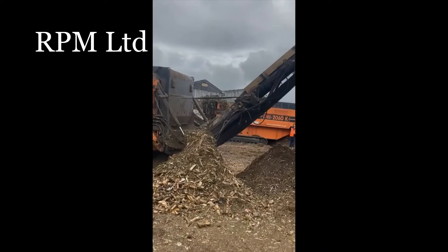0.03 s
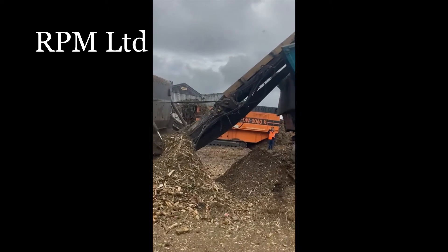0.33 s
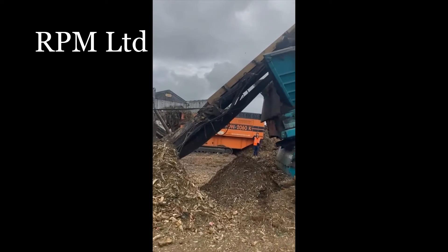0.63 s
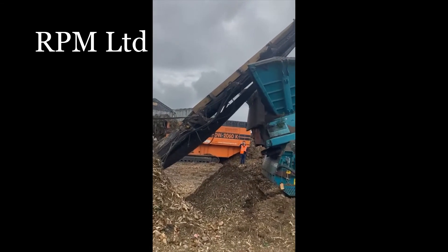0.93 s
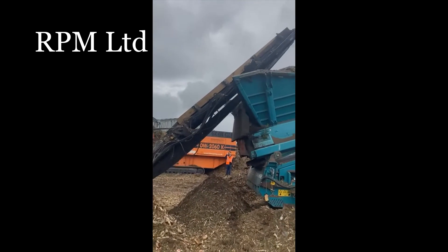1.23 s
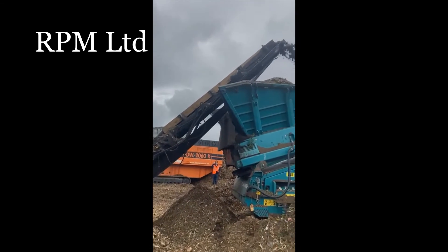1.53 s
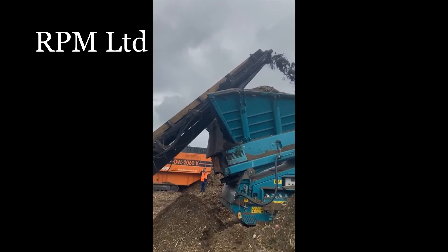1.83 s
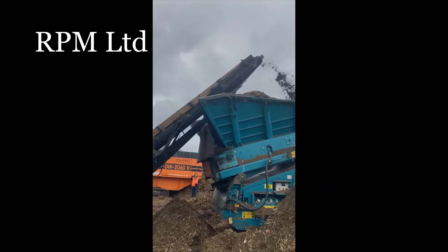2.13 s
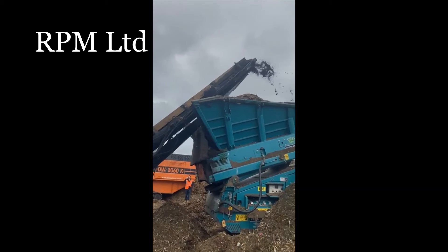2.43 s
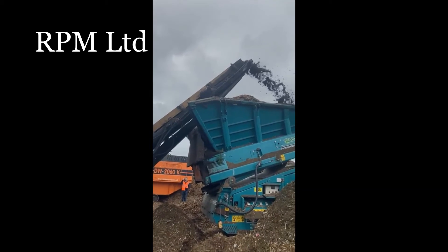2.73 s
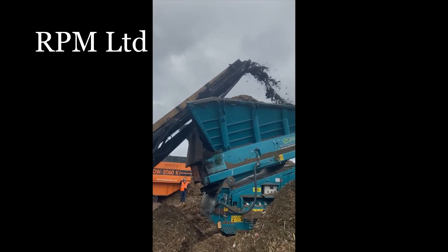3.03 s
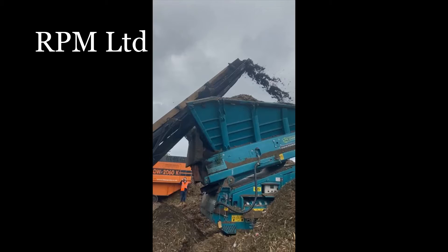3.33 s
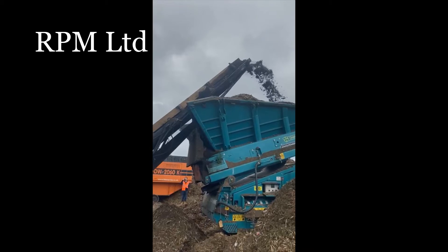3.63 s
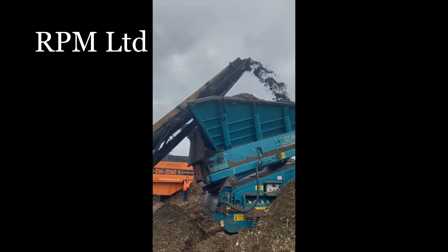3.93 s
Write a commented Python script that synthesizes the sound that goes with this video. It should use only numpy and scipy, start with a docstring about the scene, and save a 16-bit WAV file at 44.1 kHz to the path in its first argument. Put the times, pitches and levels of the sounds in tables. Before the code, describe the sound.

A diesel wood shredder drones and roars in an open yard, crunching wood about once a second as chips pour off a belt. The belt's rasp and a hydraulic whine give way to steel rattling, and wind briefly brushes the microphone.

```python
"""A diesel wood shredder runs under load in an open yard, heard from a slowly turning phone.
From the start the exhaust drones over engine and fan roar, drives whine and chips pour off a rasping belt.
About once a second the rotor bites, crunching and cracking wood; near 1 s and 1.8 s heavy pieces hit
the hopper. By 2 s the phone has turned from the belt and hissing hydraulics to a rattling steel screen.
Near 3.1 s a gust brushes the microphone."""
import sys
import numpy as np
from scipy import signal
from scipy.fft import rfft, irfft
from scipy.io import wavfile

SR = 44100
rng = np.random.default_rng(int(sys.argv[2]) if len(sys.argv) > 2 else 0)


def log_audio(samples):
    """Write samples as a 16-bit WAV file to the path given in sys.argv[1]."""
    # one column per channel
    frames = np.atleast_2d(samples).T
    # limit to full scale, then quantise
    limited = np.clip(frames, -1, 1)
    pcm = np.round(limited * 32767).astype(np.int16)
    wavfile.write(sys.argv[1], SR, pcm)


N = 176400
TIME = np.arange(N) / SR
FREQS = np.fft.rfftfreq(N, 1 / SR)
PATHS = (3, N)  # direct, scattered to the left port, scattered to the right port


# Engine speed. Each row: time in seconds, firing rate in Hz.
FIRING_HZ = [(0, 75.1), (1, 75.4), (2, 75.7), (4, 75.7)]

def firing_phase(wander=0.00319):
    """Diesel firing cycle; the speed wanders slightly."""
    return cycle(curve(FIRING_HZ, TIME) * (1 + wander * walk(6.16)))


# Exhaust harmonics. Each row: multiple of the firing rate, relative level in dB.
EXHAUST_HARMONICS = [(1, 0), (2, -16.5), (3, -22), (4, -23.5), (5, -41.5), (6, -28.5), (7, -30.5), (8, -38)]

def exhaust(phase, level_db=-15, pan_db=5.5, throb_db=-0.03, flutter_db=0.9):
    """One firm pulse per firing; the overtones flutter with the load."""
    drone = undb(throb_db * walk(4.7)) * np.sin(phase)
    for k, db in EXHAUST_HARMONICS[1:]:
        drone += undb(db + flutter_db * walk(12)) * np.sin(round(k) * phase)
    return np.sqrt(2) * drone * undb(level_db + np.array([[1], [-1]]) * pan_db / 2)


# Engine and fan noise. Each row: frequency in Hz, relative density in dB.
ROAR_SPECTRUM = [(20, -6), (38, -6), (58, 4.5), (120, 5.5), (180, -1.5), (290, 5), (450, -6), (820, -5.5),
                 (1000, -13), (1550, -17), (2200, -17), (2900, -23), (5000, -23.5), (6000, -20.5),
                 (11500, -43.5)]
# Roar bands. Each entry: band edge in Hz.
ROAR_EDGES_HZ = [0, 500, 1000, 2000, 4000, 7000, 22050]

def roar(phase, level_db=-23.5, pulse_depth=0.054, pulse_rolloff_hz=450, sway_db=.6):
    """Combustion and fan noise: the lows pulse with the firings, each band sways on its own."""
    noise = rfft(colour(rng.standard_normal(PATHS), spectrum(ROAR_SPECTRUM)))
    out = 0
    for lo, hi in zip(ROAR_EDGES_HZ, ROAR_EDGES_HZ[1:]):
        band = irfft(noise * ((FREQS >= lo) & (FREQS < hi)), N)
        pulsing = 1 + pulse_depth * np.exp(-lo / pulse_rolloff_hz) * np.cos(phase)
        out += band * pulsing * undb(sway_db * walk(30))
    return undb(level_db) * out


# Breaking wood. Each row: frequency in Hz, relative density in dB.
WOOD_SPECTRUM = [(200, -38), (600, 8.5), (1100, 6), (1700, 2.5), (2200, 3.5), (3000, 4), (5000, -6),
                 (8000, -11), (11500, -31)]
# Steel hopper resonances. Each row: frequency in Hz, width in Hz, gain in dB.
HOPPER_MODES = [(680, 22, -3.5), (872, 16, -1.5), (1098, 12, 3.5), (1163, 18, -1), (1389, 16, -4),
                (1674, 16, -3.5), (2595, 20, -6), (2960, 30, -8), (3430, 16, -8.5), (4300, 20, -12)]
# Rotor bites. Each row: start in seconds, length in seconds, level in dB, treble gain in dB.
ROTOR_BITES = [(-0, 0.1, -46.5, 17.5), (0.79, 0.24, -33, 8), (1.35, 0.2, -37, 10), (1.736, 0.12, -24, -1),
               (1.846, 0.325, -30, -3.5), (2.623, 0.15, -34.5, 6.5), (2.812, 0.14, -27.5, -8),
               (3.527, 0.15, -22.5, -8.5), (3.735, 0.073, -32, -8)]
# Single pieces snapping. Each row: start in seconds, level in dB, treble gain in dB.
WOOD_SNAPS = [(.066, -25.5, 4), (.897, -20.5, 4), (.906, -20.5, 5), (1.034, -24, -5), (1.500, -22, -6),
              (1.705, -20, 2), (1.749, -21, 3), (1.768, -20, -6), (1.787, -19.5, -6), (1.815, -19.5, 1),
              (2.082, -25, -4), (2.589, -25, 2), (2.816, -22.5, 2), (3.563, -22.5, -1), (3.652, -22, -4),
              (3.988, -23, 1)]

def shredding(bite_attack_s=.02, bite_release_s=.055, snap_attack_s=.002, snap_decay_s=.014):
    """The rotor breaks wood in runs of splintering and sharp snaps, coloured by the hopper."""
    hopper = 1 + sum(undb(db) * resonance(hz, width) for hz, width, db in HOPPER_MODES)
    splinters = unit(clicks(per_s=1200, spread_db=1))
    fibres = unit(clicks(per_s=4100, spread_db=-0.5))
    blows = []
    for start, length, db, treble_db in ROTOR_BITES:
        rise = np.clip((TIME - start) / bite_attack_s, 0, 1)
        fall = np.clip((start + length - TIME) / bite_release_s + .5, 0, 1)
        blows.append((undb(db) * rise * fall * splinters, treble_db))
    for start, db, treble_db in WOOD_SNAPS:
        age = np.maximum(TIME - start, 0)
        envelope = np.minimum(age / snap_attack_s, 1) * np.exp(-age / snap_decay_s)
        blows.append((undb(db) * envelope * fibres, treble_db))
    treble = highpass(corner_hz=2200)
    lows = rfft(sum(blow for blow, _ in blows)) * (1 - treble)
    highs = rfft(sum(blow * undb(db) for blow, db in blows)) * treble
    return irfft((lows + highs) * unit(spectrum(WOOD_SPECTRUM) * hopper), N)


# Hopper strikes. Each row: start in seconds, level in dB, tilt about 1 kHz in dB per octave.
HOPPER_KNOCKS = [(.902, -23, 5.5), (1.040, -29, -4), (1.753, -30, 5), (1.773, -20.5, -3), (1.817, -26, -7)]

def knocks(attack_s=.003):
    """Heavy pieces hit the hopper wall and ring its modes."""
    out = np.zeros(N)
    for start, db, tilt in HOPPER_KNOCKS:
        age = np.maximum(TIME - start, 0)
        for hz, width, mode_db in HOPPER_MODES:
            gain = undb(db + mode_db + tilt * np.log2(hz / 1000))
            envelope = np.minimum(age / attack_s, 1) * np.exp(-np.pi * width * age)
            out += gain * envelope * np.sin(2 * np.pi * (hz * age + rng.random()))
    return ports(out)


# Chip stream. Each row: time in seconds, level in dB.
CHIP_FLOW_DB = [(0, -35), (.6, -37.5), (1.2, -37), (2, -36), (2.4, -35.5), (2.9, -34.5), (4, -35)]
# Chip rustle. Each row: frequency in Hz, relative density in dB.
CHIP_SPECTRUM = [(300, -1), (850, 3), (1250, 6.5), (1700, -2.5), (2200, -28), (2900, 10.5), (3500, -42),
                 (5200, -5), (9000, 3), (11500, -7)]
# Clumps landing. Each row: time in seconds, gain of the high-passed rustle in dB.
CHIP_CLUMPS = [(1.44, 10), (1.76, 6), (1.97, 10), (2.69, 6), (2.78, 2), (2.88, 11), (2.95, 9), (3.11, 12),
               (3.34, 6), (3.56, 7.5), (3.87, 4.5)]

def chips(flutter_db=0.5, clump_half_width_s=0.021):
    """Chips pour off the belt unevenly; a landing clump brightens the rustle."""
    clump_db = sum(db * swell(at, clump_half_width_s) for at, db in CHIP_CLUMPS)
    rustle = colour(clicks(per_s=6000, spread_db=2), spectrum(CHIP_SPECTRUM))
    bright = irfft(rfft(rustle) * highpass(corner_hz=12400), N)
    flow = undb(curve(CHIP_FLOW_DB, TIME) + flutter_db * walk(20))
    return flow * (rustle + (undb(clump_db) - 1) * bright)


def lumps(per_s=260, level_db=-30, t60_s=0.098, low_hz=520, high_hz=3100):
    """Wood lumps tumble in the hopper, each ringing briefly; louder with the chip stream."""
    tilt_db_per_octave, spread_db = -2.3, 0.5
    out = np.zeros((2, N))
    for when, pitch, size, left, right in rng.random((int(per_s * N / SR), 5)):
        start = int(when * N)
        hz = low_hz * (high_hz / low_hz) ** pitch
        db = tilt_db_per_octave * np.log2(hz / low_hz) - spread_db * np.log(size + 0.01)
        ring = undb(db) * damped_sine(hz, t60_s)
        out[:, start:start + len(ring)] += np.outer([.5 + left, .5 + right], ring[:N - start])
    return undb(level_db) * unit(ports(out) * undb(curve(CHIP_FLOW_DB, TIME)))


# Shaft, gear and pump tones. Each row: frequency in Hz, level in dB, width in Hz.
DRIVE_TONES = [(56.5, -37, 4), (122, -35, 1.5), (189.5, -40, 1.5), (214, -37, 1), (268, -37, 8),
               (452, -45, 6), (883, -40, 14), (1097, -45, 14), (1286, -45, 8), (1608, -47, 12)]

def drives(flutter_db=2):
    """Drive train tones, unsteady in pitch and level."""
    out = np.zeros(N)
    for hz, db, width in DRIVE_TONES:
        flutter = undb(flutter_db * walk(10))
        phase = cycle(hz + .7 * width * walk(14))
        out += undb(db) * unit(flutter * np.sin(phase))
    return ports(out)


# Belt rasp. Each row: frequency in Hz, relative density in dB.
BELT_SPECTRUM = [(250, -34), (550, -1.5), (850, -1.5), (1150, 0), (1650, -5.5), (2100, -16), (2600, -8.5),
                 (3300, -11.5), (6000, -77)]
# Rasp as the phone turns away. Each row: time in seconds, level in dB.
BELT_DB = [(0, -30.5), (.9, -31.5), (1.6, -38.5), (2.2, -43), (4, -38)]
# Conveyor frame resonances. Each row: frequency in Hz, width in Hz, gain in dB.
FRAME_MODES = [(3740, 260, -5), (4250, 380, -1), (4520, 380, 0)]
# Frame scrape. Each row: time in seconds, level in dB.
SCRAPE_DB = [(0, -43), (.7, -43.5), (1.45, -42), (1.65, -46.5), (1.8, -41), (2.2, -58.5), (3.3, -59),
             (3.65, -45), (4, -55)]

def conveyor(left_lag_s=.00038):
    """The belt rasps over its rollers off to the right and scrapes its frame straight ahead."""
    left = colour(clicks(per_s=4000, spread_db=2)[0], spectrum(BELT_SPECTRUM))
    right = irfft(rfft(left) * np.exp(2j * np.pi * FREQS * left_lag_s), N)
    rasp = undb(curve(BELT_DB, TIME)) * np.array([left, right])
    return rasp + undb(curve(SCRAPE_DB, TIME)) * rubbed_steel(FRAME_MODES)


# Screen rattle. Each row: frequency in Hz, relative density in dB.
RATTLE_SPECTRUM = [(300, -37), (650, 12), (900, 6), (1100, 6), (1550, 10), (2100, -6), (2850, 2.5),
                   (3400, -66), (9000, -71)]
# Rattle as the phone turns towards it. Each row: time in seconds, level in dB.
RATTLE_DB = [(0, -57), (1.2, -37.5), (2, -36), (4, -35)]
# Screen resonances. Each row: frequency in Hz, width in Hz, gain in dB.
SCREEN_MODES = [(2530, 180, -2), (2700, 200, -2), (2890, 220, 0)]
# Sliding loads. Each row: peak time in seconds, half width in seconds, level in dB.
SCREEN_LOADS = [(2.1, 0.1, -42.5), (2.69, 0.048, -42), (2.88, 0.053, -36.5), (3.62, 0.1, -42.5)]

def screen():
    """Loose wood chatters on a shaking steel screen, which rings when a load slides over it."""
    chatter = colour(clicks(per_s=900, spread_db=6), spectrum(RATTLE_SPECTRUM))
    loads = sum(undb(db) * swell(at, half_width) for at, half_width, db in SCREEN_LOADS)
    return yard(undb(curve(RATTLE_DB, TIME)) * chatter) + loads * rubbed_steel(SCREEN_MODES)


def rubbed_steel(modes, flare_db=1.8):
    """Dense stick-slip ticks ring each resonance, which swells a little on its own."""
    ticks = clicks(per_s=2500, spread_db=2)[0]
    out = np.zeros(N)
    for hz, width, db in modes:
        ring = colour(ticks, resonance(hz, width) ** 2)
        out += undb(db + flare_db * walk(14)) * ring
    return unit(out)


def pings(per_s=90, t60_s=.14, relative_db=-8):
    """Single chips ring the screen or frame near a resonance; the level follows the rattle."""
    out = np.zeros(N)
    modes = SCREEN_MODES + FRAME_MODES
    for when, which, offset in rng.random((int(per_s * N / SR), 3)):
        start = int(when * N)
        hz, width, _ = modes[int(which * len(modes))]
        ring = damped_sine(hz + (offset - .5) * 2 * width, t60_s) / hz
        out[start:start + len(ring)] += ring[:N - start]
    return undb(relative_db + curve(RATTLE_DB, TIME)) * unit(out)


# Hydraulic whine. Each row: time in seconds, fundamental level in dB, octave level in dB.
WHINE_DB = [(0, -40, -53), (1.3, -39, -55), (1.7, -50, -55), (2.5, -54, -45.5), (4, -57, -47.5)]
# Oil hiss. Each row: frequency in Hz, relative density in dB.
HISS_SPECTRUM = [(1200, -41), (2500, -20), (3200, 21), (3900, -5), (4600, 0), (5900, -6), (7200, -40),
                 (11000, -53)]
# Hiss as the phone turns away. Each row: time in seconds, level in dB.
HISS_DB = [(0, -41), (1, -42), (2, -50), (4, -55)]

def hydraulics(whine_hz=1933, waver_hz=5, flutter_db=3):
    """A wavering whine and its octave over the hiss of oil."""
    phase = cycle(whine_hz + waver_hz * walk(25))
    times, *levels = np.array(WHINE_DB).T
    whine = np.zeros(N)
    for k, db in enumerate(levels, 1):
        partial = unit(undb(flutter_db * walk(15)) * np.sin(k * phase))
        whine += undb(np.interp(TIME, times, db)) * partial
    hiss = colour(rng.standard_normal(PATHS), spectrum(HISS_SPECTRUM))
    return yard(undb(curve(HISS_DB, TIME)) * hiss) + ports(whine)


def gust(at_s=3.095, half_width_s=.02, level_db=-15.5, corner_hz=115):
    """A short buffet of wind, independent at each microphone port."""
    ratio = FREQS / corner_hz
    rumble = colour(rng.standard_normal((2, N)), ratio / (1 + ratio ** 3))
    return undb(level_db) * swell(at_s, half_width_s) * rumble


# Yard scatter. Each row: frequency in Hz, level against the direct sound in dB.
SCATTER_DB = [(30, 0), (100, -3), (1500, -4.5), (4000, -6.5), (5500, -10.5), (11000, -10.5)]

def yard(paths):
    """Direct sound plus what machines and heaps scatter to each port."""
    return ports(paths[0]) + irfft(rfft(paths[1:]) * spectrum(SCATTER_DB), N)


# Port phase. Each row: frequency in Hz, lead of the left port in radians.
LEFT_LEAD_RAD = [(0, 0), (320, -.25), (500, -1.3), (860, -1.3), (1300, -.4), (1700, .3), (2150, 2.7),
                 (2700, 2), (3200, 3.1), (5200, 3.1), (6300, 3.2), (7200, 5.5), (7800, 6.2), (9500, 6.4),
                 (10200, 7.3), (10700, 9), (11700, 9.4)]
# Port balance. Each row: frequency in Hz, left minus right in dB.
BALANCE_DB = [(30, 4), (130, 2), (330, 3), (750, .5), (1200, -3.5), (2100, 0), (11000, .3)]

def ports(x):
    """Direct sound reaches the two microphone ports out of step and unequally loud."""
    sides = np.array([[.5], [-.5]])
    shift = np.exp(1j * sides * curve(LEFT_LEAD_RAD, FREQS))
    return irfft(rfft(x) * shift * spectrum(BALANCE_DB) ** sides, N)


def clicks(per_s, spread_db):
    """Random tiny impacts of uneven size on each path."""
    size = undb(spread_db * np.minimum(rng.exponential(size=PATHS), 3))
    return (rng.random(PATHS) < per_s / SR) * size * np.sign(rng.standard_normal(PATHS))


def damped_sine(hz, t60_s):
    """A ring that falls 60 dB, then ends."""
    age = TIME[:int(t60_s * SR)]
    return np.sin(2 * np.pi * hz * age) * np.exp(-np.log(1000) * age / t60_s)


def resonance(hz, width_hz):
    """Complex response of one mode."""
    return 1 / (1 + 2j * (FREQS - hz) / width_hz)


def highpass(corner_hz):
    """Second-order gain, one half at the corner."""
    return 1 / (1 + (corner_hz / (FREQS + 1)) ** 2)


def swell(at_s, half_width_s):
    """Gaussian envelope, peak 1."""
    return np.exp(-((TIME - at_s) / half_width_s) ** 2)


def walk(rate_hz):
    """Smooth random drift, rms 1."""
    return colour(rng.standard_normal(N), np.exp(-(FREQS / rate_hz) ** 2))


def cycle(hz):
    """Running phase of a moving frequency."""
    return 2 * np.pi * (np.cumsum(hz) / SR + rng.random())


def colour(x, gain):
    """Filter by a gain per frequency, then scale to rms 1."""
    return unit(irfft(rfft(x) * gain, N))


def spectrum(rows):
    """Gain at every frequency from (Hz, dB) points."""
    hz, db = np.array(rows, float).T
    return undb(np.interp(np.log(FREQS + 1), np.log(hz), db))


def curve(rows, at):
    """Straight lines through the rows."""
    return np.interp(at, *np.array(rows, float).T)


def unit(x):
    """Scale to rms 1."""
    return x / np.sqrt(np.mean(np.abs(x) ** 2))


def undb(db):
    """Decibels to gain."""
    return 10 ** (np.asarray(db) / 20)


def scene():
    """The whole machine in its yard, in stereo."""
    phase = firing_phase()
    machine = exhaust(phase) + drives() + hydraulics() + conveyor() + screen() + pings()
    return machine + yard(roar(phase) + chips() + shredding()) + knocks() + lumps() + gust()


def record(dry):
    """The phone cuts the top treble steeply."""
    cutoff_hz = 11550
    return signal.sosfilt(signal.ellip(10, .2, 80, cutoff_hz, fs=SR, output="sos"), dry)


dry = scene()
out = record(dry)
log_audio(out)
```